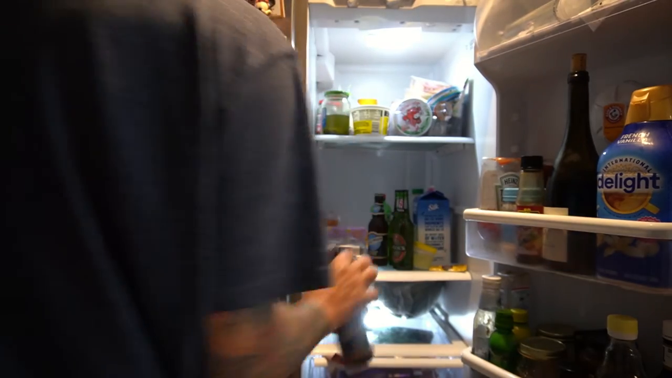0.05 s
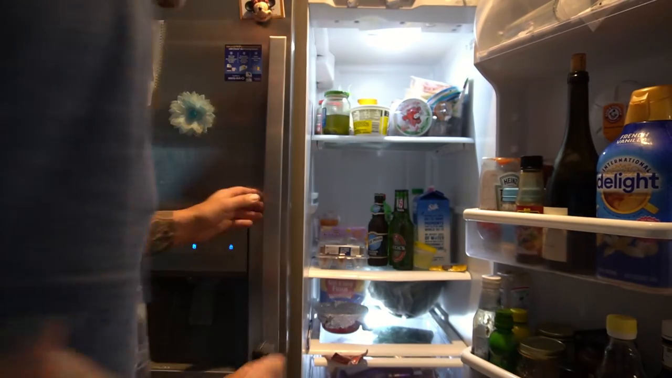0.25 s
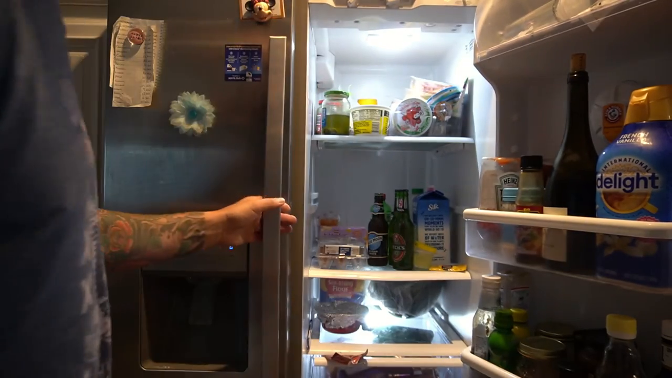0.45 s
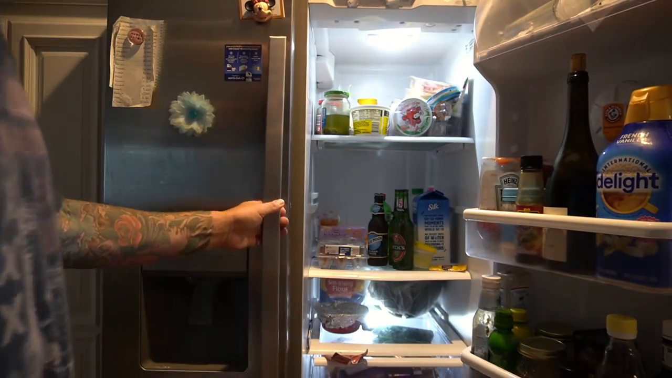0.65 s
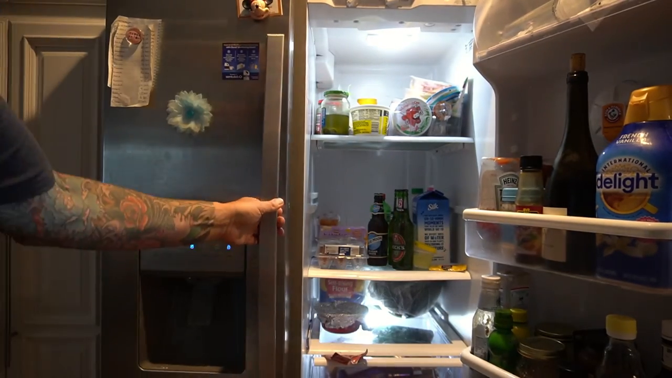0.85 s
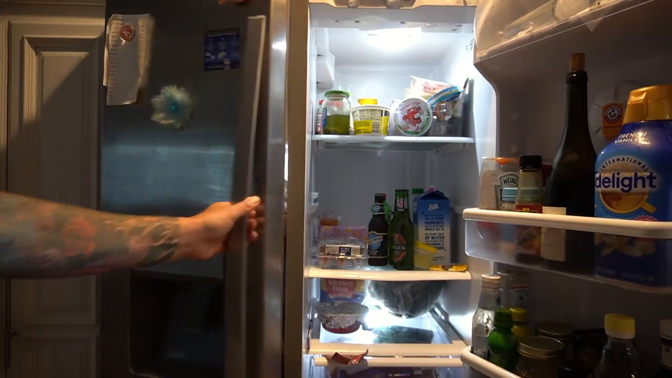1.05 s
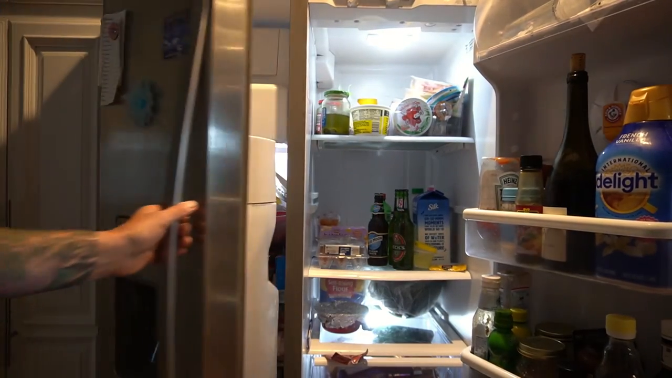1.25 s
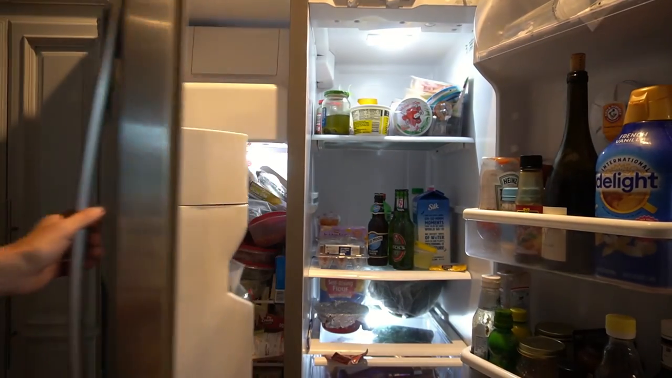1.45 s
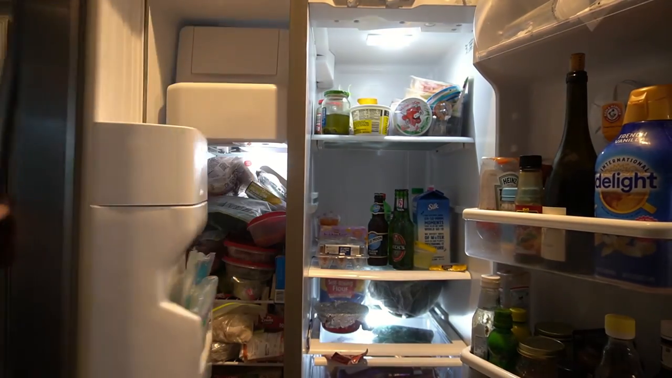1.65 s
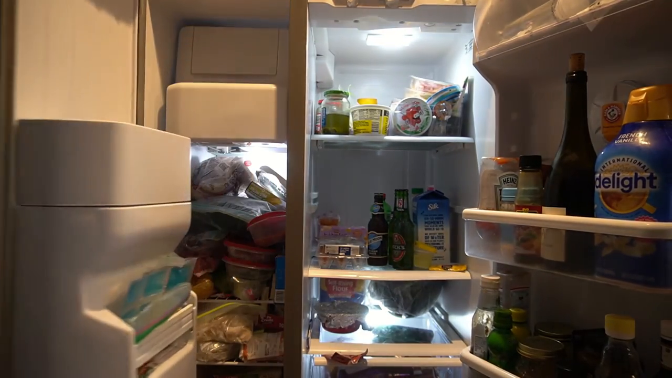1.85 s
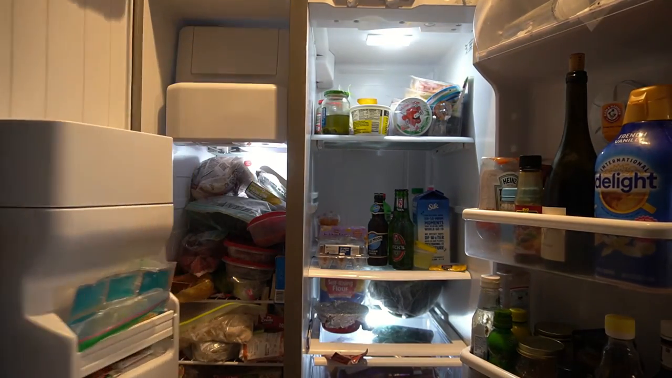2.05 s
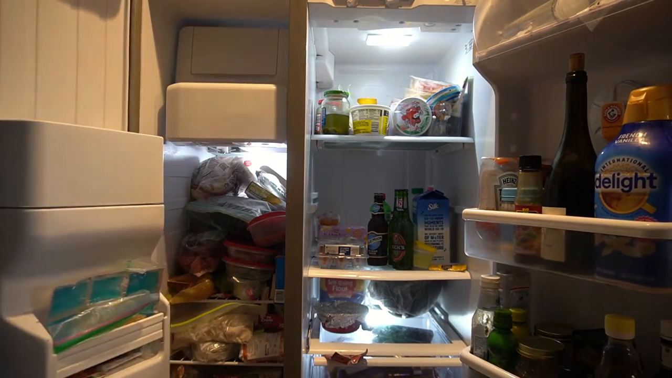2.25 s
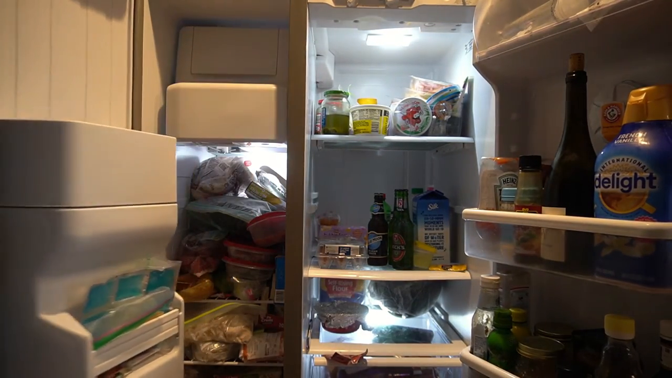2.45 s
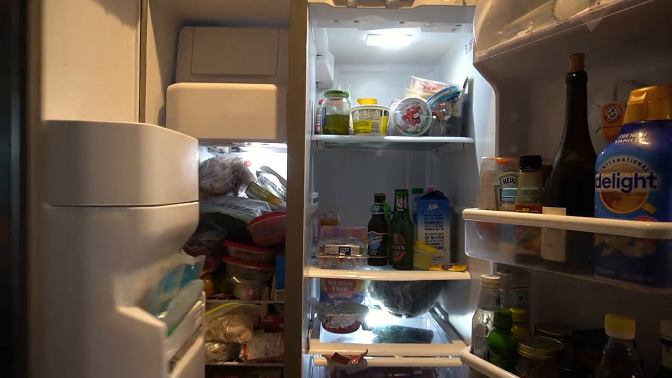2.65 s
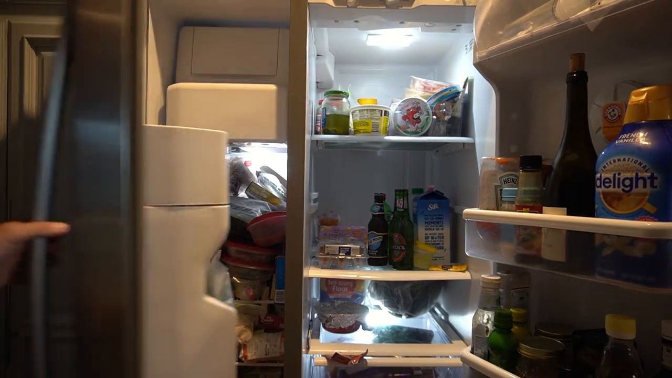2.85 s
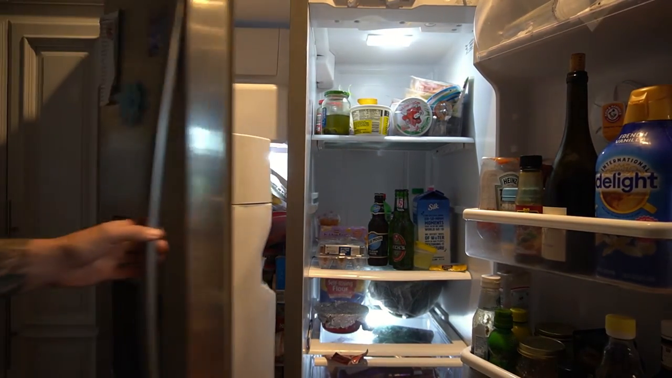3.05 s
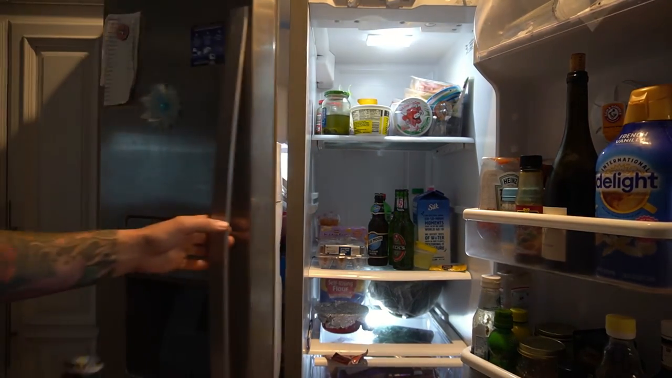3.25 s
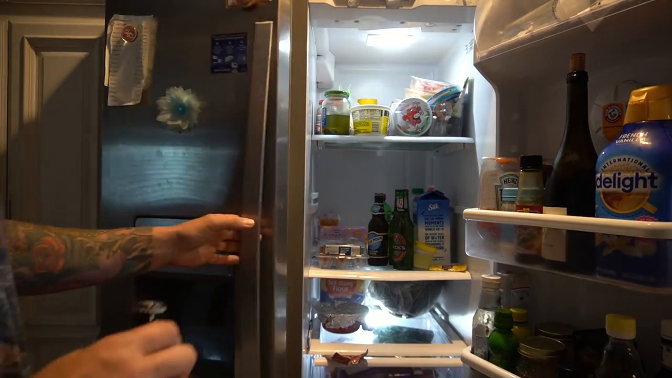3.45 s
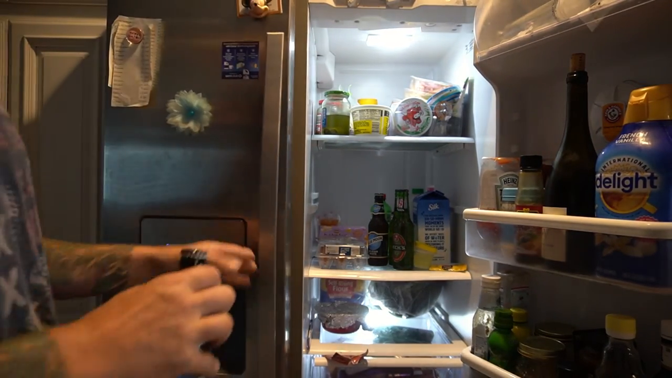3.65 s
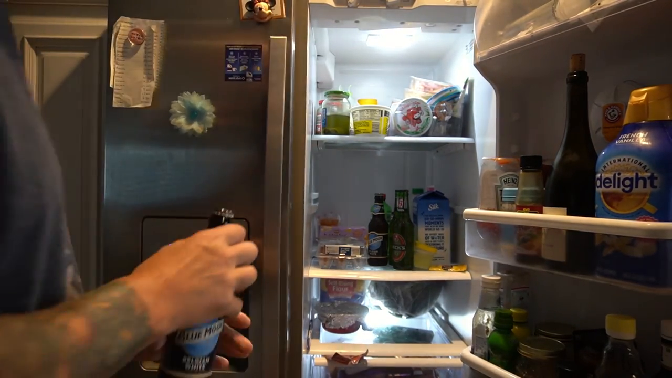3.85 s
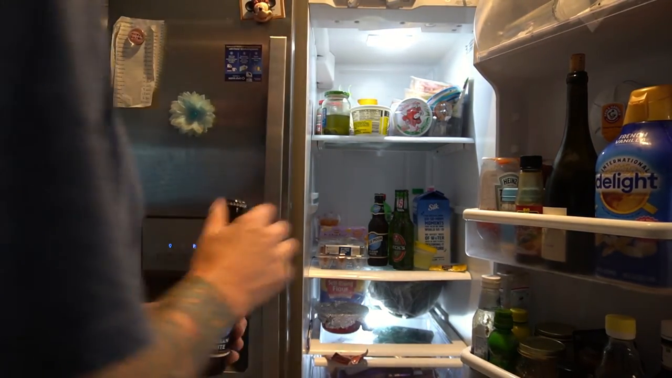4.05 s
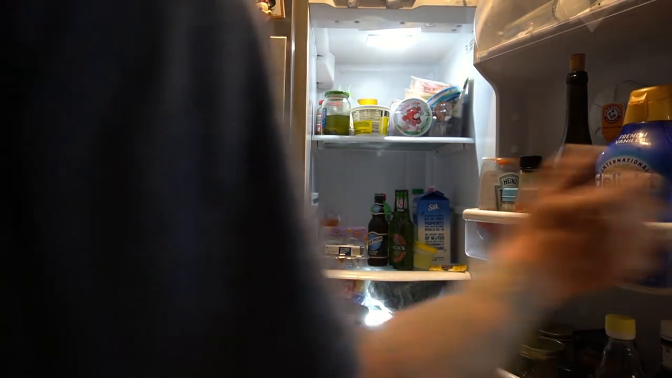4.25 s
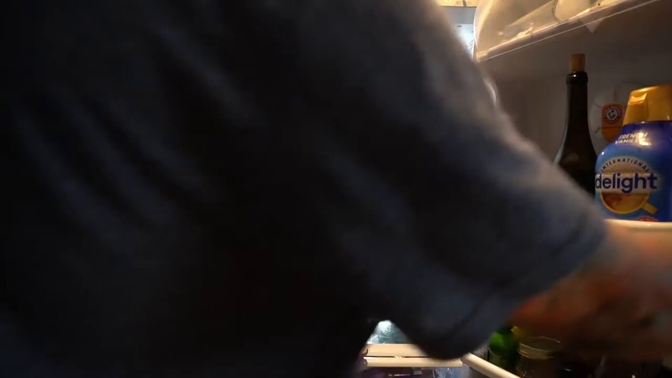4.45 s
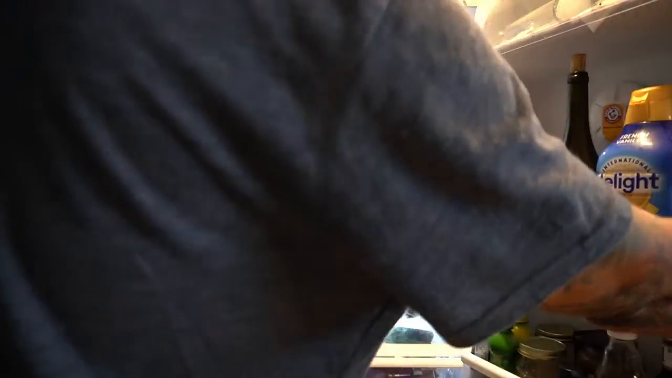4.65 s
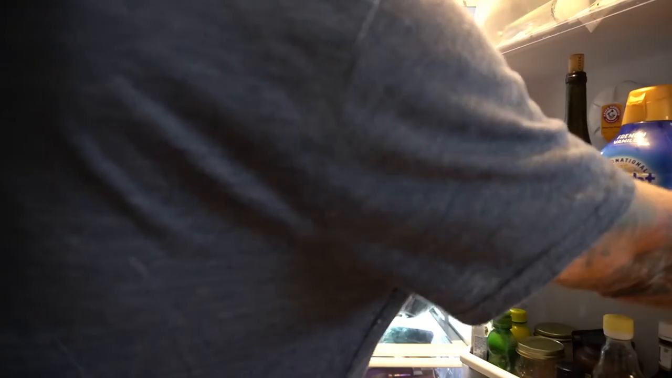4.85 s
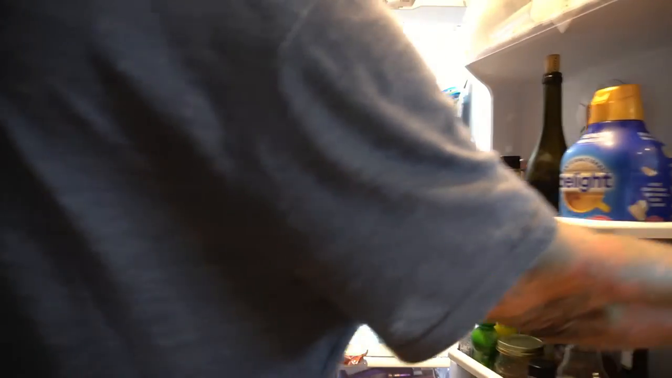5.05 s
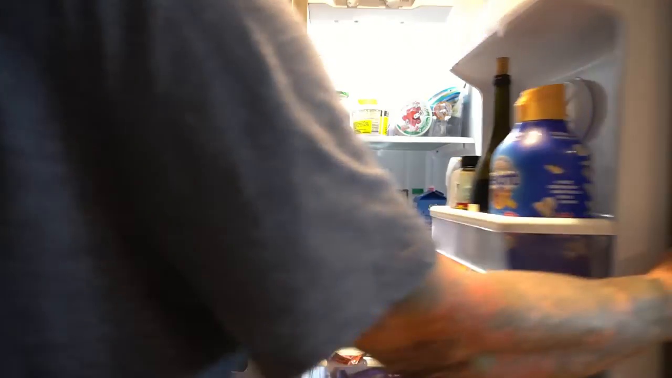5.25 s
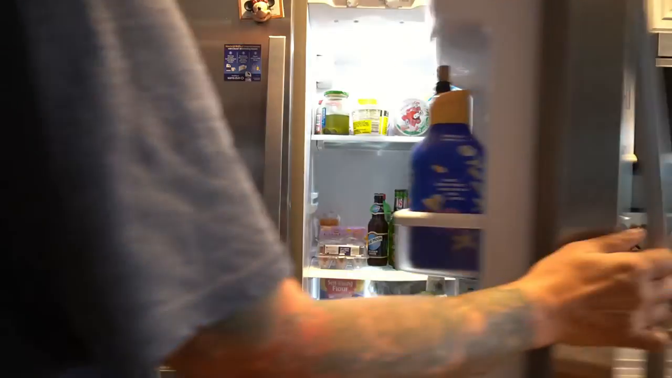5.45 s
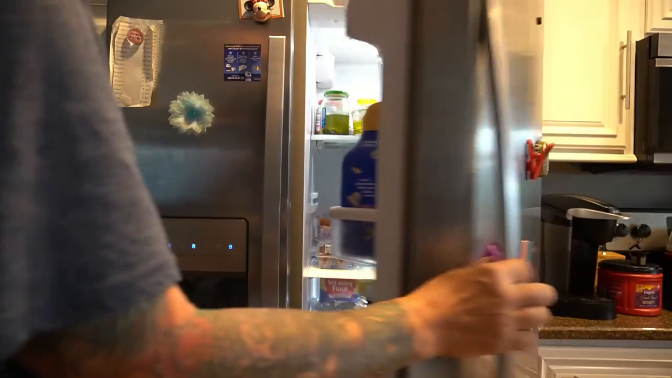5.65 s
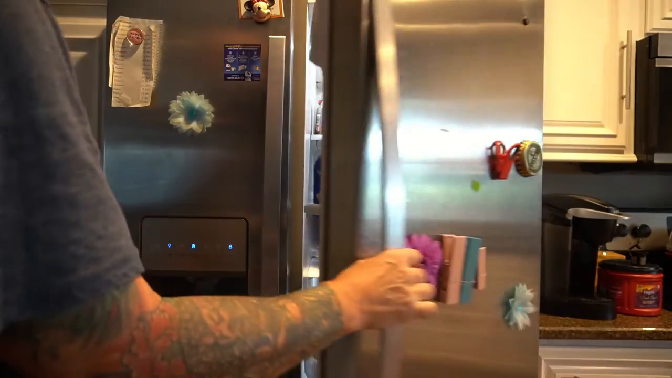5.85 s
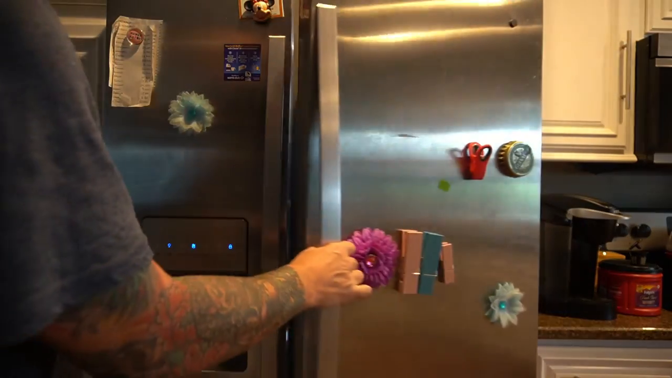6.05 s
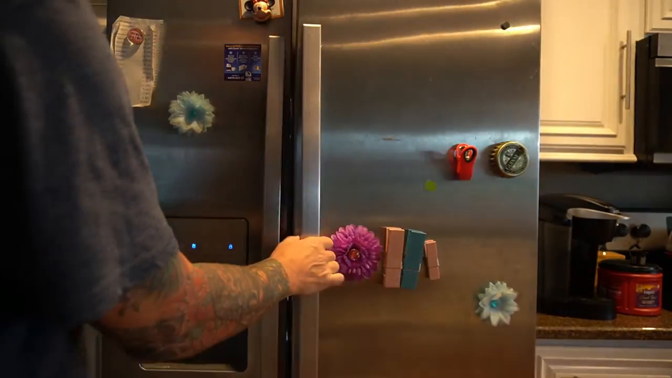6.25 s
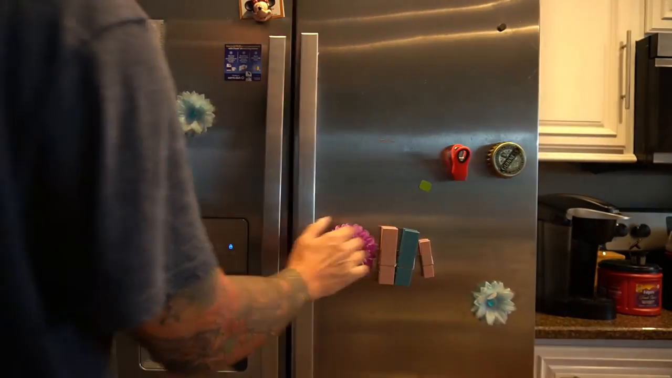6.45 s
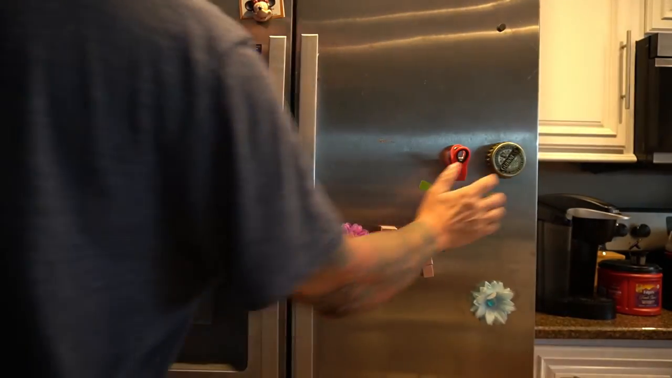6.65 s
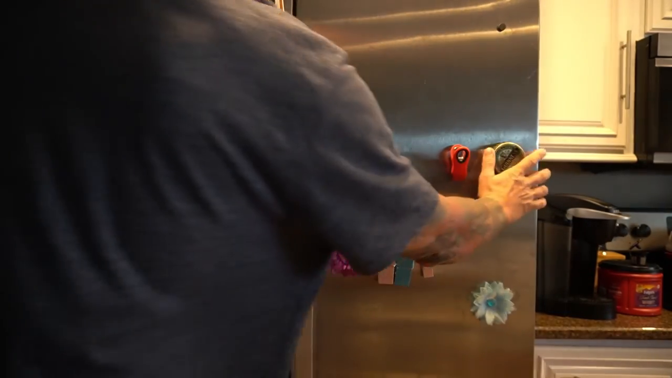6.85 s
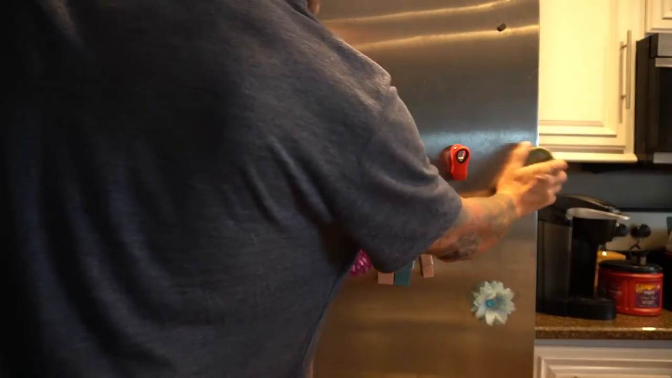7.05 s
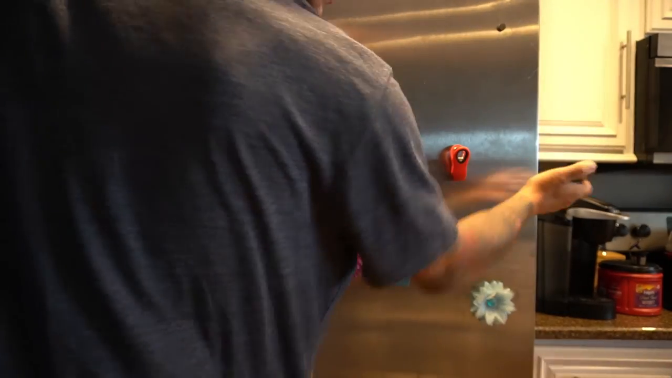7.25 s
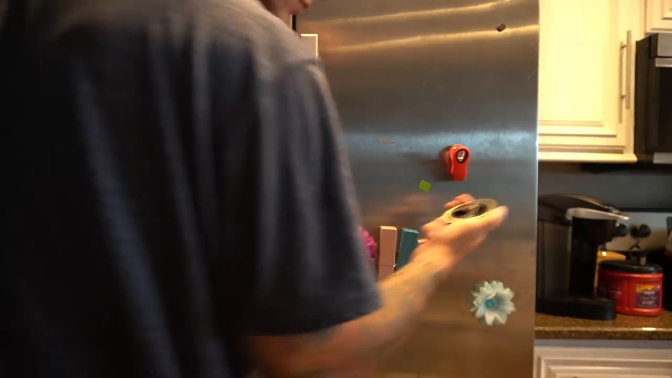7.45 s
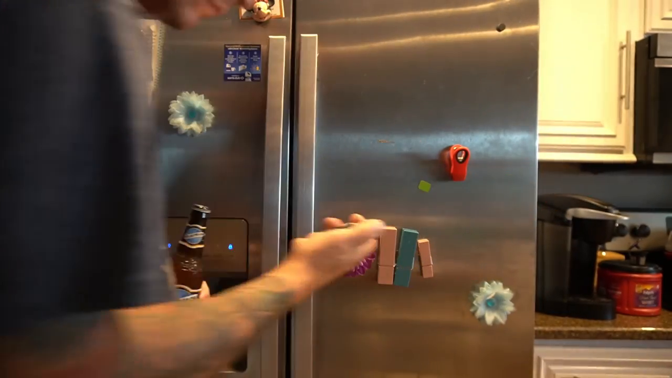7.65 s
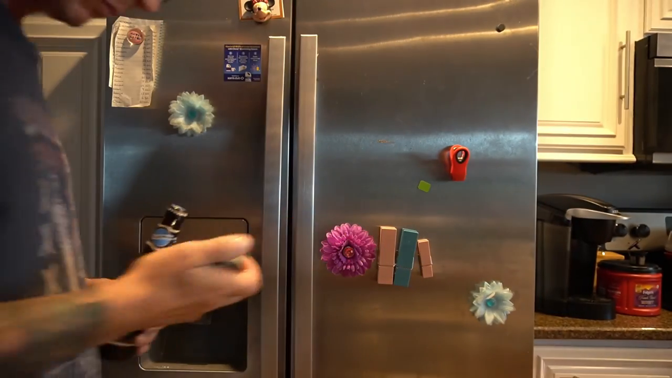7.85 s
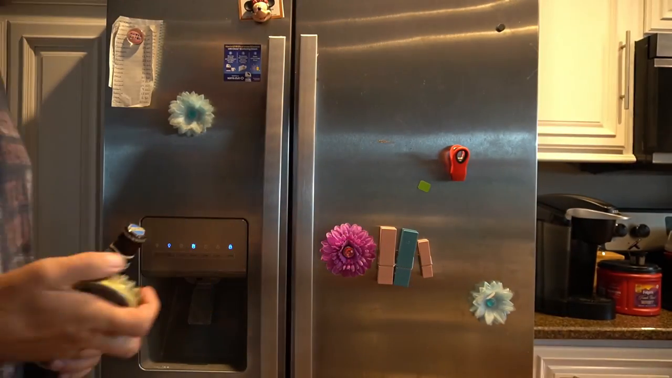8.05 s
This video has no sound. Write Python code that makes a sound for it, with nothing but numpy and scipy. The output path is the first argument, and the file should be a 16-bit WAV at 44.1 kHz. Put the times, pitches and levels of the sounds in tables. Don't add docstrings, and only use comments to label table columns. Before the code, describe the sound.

A refrigerator hums low and steadily in a hard-walled kitchen, heard by close stereo microphones, with a fan tone near 210 Hz and soft rushing air. Sleeves rustle and fingers touch a handle from 0.2 to 0.7 s. At 0.8 s the rubber seal creaks and ticks, then pops and tears free around 0.95-1.05 s; the fan swells clearly as the freezer stands open, with only faint bumps and cloth. Bins rattle at 3.4-3.6 s, a hinge snaps at 3.62, and the door thuds shut at 3.76, rebounding. The fan drops back. Glass is nudged at 4.0, a sleeve scrapes at 4.35, and a bottle clunks into the rack at 4.87, rocking briefly. Jars knock at 6.0, and the big door slams at 6.5. A hand slaps a magnet at 6.9; it snaps off at 7.06 with flapping steel. Soft rustle and hum remain until about 8.1 s.

```python
import sys
import numpy as np
from scipy import signal
from scipy.fft import rfft, irfft
from scipy.io import wavfile
from scipy.ndimage import uniform_filter1d

SR = 44100
rng = np.random.default_rng(int(sys.argv[2]) if len(sys.argv) > 2 else 0)


def pcm_store(signal):
    levels = np.round(np.clip(np.atleast_2d(signal), -1, 1) * 32767)
    wavfile.write(sys.argv[1], SR, levels.astype(np.int16).T)


def invert_db(level):
    return 10 ** (np.asarray(level, dtype=float) / 20)


N = 358091

# frequency in Hz, level in dB rms with the freezer shut, the same with it open.
COMPRESSOR = [(59.8, -55, -54), (120, -54.5, -50), (154.4, -76, -49), (303, -60.5, -53.5),
              (412.3, -57.5, -48.5), (1474, -103, -62), (1685, -79, -71.5), (2997, -72.5, -77),
              (3110, -69.5, -70.5), (11434, -83, -97)]
# time in seconds, level in dB.
FAN = [(0, -42.5), (.9, -42), (1.1, -33), (1.6, -29), (3.1, -30.5), (3.3, -34), (3.7, -33.5), (3.8, -42.5),
       (4.3, -42.5), (4.7, -45), (5.3, -44), (6.4, -50.5), (6.7, -50), (7.4, -52), (8.12, -45)]
BLADE_HZ, SWAY_HZ = 212.3, 204.2
SHUT_DB, OPENING_DB = -48, 22.5
RUSH_DB, RUSH_OPEN_DB = -45.5, 3.5
# frequency in Hz, density in dB per Hz.
RUSH = [(15, -69), (25, -52), (114, -9), (153, -32), (185, -1), (212, -2.5), (263, -16.5), (335, -13.5),
        (416, -15), (476, -17), (1130, -29), (3080, -37.5), (3430, -39), (12500, -49.5), (16000, -51)]

# peak in seconds, rise in seconds, fall in seconds, peak in dB.
SQUEAK = [
    (5.5, .12, .15, -64),
]
# peak in seconds, rise in seconds, fall in seconds, peak in dB, share of sheen from 0 to 1.
RUSTLE = [(.2, .08, 0.192, -58.5, 0.3), (.42, 0.093, 0.185, -66, 1), (.69, 0.16, 0.12, -60.5, 0.24),
          (1.05, 0.028, 0.205, -43.5, 0), (1.28, 0.081, 0.074, -54.5, 0), (1.43, 0.011, 0.038, -61, 1),
          (2.39, 0.056, 0.32, -61.5, 0.2), (2.66, 0.27, 0.191, -62.5, 0.5), (2.98, 0.11, 0.35, -64.5, 0.5),
          (3.355, 0.019, 0.095, -51, 0.36), (4.352, 0.042, 0.046, -53, 1), (4.36, 0.128, 0.24, -55, 0.02),
          (4.5, 0.041, 0.062, -71, 0), (5.47, 0.26, 0.36, -63.5, 0.05), (5.81, .15, 0.19, -62, 0.3),
          (6.7, .02, .03, -58, .5), (6.838, 0.0734, 0.16, -49.5, 0.03), (7.82, 0.14, 0.306, -56.5, 0.13)]
# frequency in Hz, density in dB per Hz.
CLOTH = [(410, -50), (700, 0), (875, 0), (1210, -9), (1280, -4.5), (2130, -3.5), (3600, -5.5), (8420, -6.5),
         (16000, -24.5)]
SWELL_DB = 13
CRACKLE_SHARE, SHEEN_HZ = 0.21, 4700
# peak in seconds, rise in seconds, fall in seconds, peak in dB, pitch in Hz.
SCUFFS = [
    (0.303, 0.031, .05, -51, 2800),
    (4.352, .015, 0.04, -44.5, 3550),
    (4.35, .012, .02, -62, 6500),
    (4.51, .03, .05, -46, 2100),
    (6.835, 0.048, .03, -44, 6300),
]

# frequency in Hz, level in dB.
LIKENESS = [(60, -13), (150, -27.5), (380, -13), (950, -6), (2380, -2.5), (5980, -0.5), (15000, 0.5)]
# frequency in Hz, time to die by 60 dB in seconds.
KITCHEN = [(60, 0.12), (200, 0.386), (500, 0.5414), (1500, 0.56), (4000, 0.4754), (12000, 0.5)]

BANDS_HZ = [90, 700, 2500, 8000]
CLACK_SHARE = 0.41
ONSET_CYCLES = .55

# start in seconds, peak in dB, brightness in dB, contact in milliseconds.
HAND = [
    (.17, -54, 1.5, 40),
    (.28, -46.5, -9.5, 32),
    (.597, -41.5, -28, 86),
    (.68, -38.5, -43, 22),
]
TUG = [
    (.8125, -30, -23, 6.5),
    (.816, -25, -14, 18),
    (.836, -29, 1.5, 8.8),
    (.8525, -18.5, -3.5, 2.96),
    (.862, -25.5, -6, 10),
    (.876, -29, 8, 12),
    (.899, -28, 2, 4),
    (.92, -26, 1, 22),
    (.941, -23, 6, 11),
]
POP = [
    (.9555, -13, 3, 7.3),
    (.968, -19.5, -3, 6.4),
]
PEEL = [
    (.980, -18.5, 2, 3.1),
    (.987, -19.5, -17, 3),
]
HINGE = [
    (2.647, -39.5, -10, 7.6),
    (3.424, -24.5, 14, 5.1),
    (3.434, -21.5, -12.5, 5.7),
    (3.511, -20.5, 17, 26),
    (3.571, -21.5, 6.5, 41),
]
CLOSER = [
    (3.6225, -6.5, -13, 2.7),
    (3.627, -7.5, 0, 4.9),
]
LATCH = [
    (3.6195, -21, -4, 2.5),
    (4.864, -23.5, 1.5, 2.4),
    (6.497, -25, -11, 8),
    (7.051, -9.5, -8, 3),
]
GASKET = [
    (3.751, -15.5, -24, 7.1),
]
NUDGE = [
    (4.021, -26.5, -5, 18),
    (4.755, -25, -13, 0.98),
]
TICKS = [
    (4.7555, -32, -12, 1),
    (4.762, -24.5, -15, 1.5),
    (4.77, -37, -8, 13),
]
JARS = [
    (5.679, -41.5, -9, 14),
    (5.724, -38.5, -3, 14),
    (6.306, -25.5, -12, 4),
    (6.33, -38, -27, 22),
]
GRIP = [
    (6.8985, -10, -5.5, 12),
    (6.905, -15, 12, 6.9),
    (6.925, -19, -18.5, 9.3),
]

# start in seconds, peak in dB, brightness in dB, contact in milliseconds, thump in dB.
SEAL = [
    (1.009, -12.5, 11, 25, -11.5),
    (1.018, -15.5, -15.5, 4.4, 23),
    (1.0275, -5, 20, 7, -7),
    (1.034, -22, 8, 3.1, 11),
    (1.044, -22, -7, 3.5, -22),
    (1.119, -21.5, -3, 6.1, -13),
    (1.279, -31.5, -7, 8.2, -3.5),
    (1.428, -38, -0.5, 4, 4),
]
STOP = [
    (2.189, -43.5, -8, 47, 21),
    (2.428, -50, 5.5, 15, 30),
    (4.488, -35, 4, 20, 15),
]
FREEZER = [
    (3.7595, -3.5, 7.5, 7.3, 10),
    (3.766, -14, -3, 5.9, 16),
    (3.778, -16.5, -23, 8, 11),
    (3.784, -17.5, -13.5, 3, 1),
    (3.8, -14, -4.5, 13, -3),
    (3.826, -21.5, -1, 10, 5),
]
RACK = [
    (4.867, -11.5, 8, 8.2, 7),
    (4.873, -13, 8.5, 3.35, 3),
    (4.884, -19.5, 10, 6, 6),
    (4.902, -21.5, 3, 18, -3),
    (4.941, -18, -13, 4.3, 9),
    (4.958, -24.5, -5, 10, 2),
    (4.984, -27, -13, 5.1, 16),
]
SHELF = [
    (5.9985, -13.5, -0.5, 10, 15),
    (6.004, -13, 8, 20, 11),
    (6.013, -24, 0, 10, -2.5),
    (6.187, -32, -9, 25, -18.5),
]
SLAM = [
    (6.5065, -6, 5.5, 0.87, 1.5),
    (6.516, -23, -5.5, 6.7, -11),
    (6.539, -23.5, -11, 11.7, 8),
    (6.575, -20.5, -20, 16, 6),
]
MAGNET = [
    (7.0555, -4, 0, 3, 5),
    (7.061, -7, 5, 14, 7.5),
    (7.074, -10, -14, 17, 2),
    (7.105, -11, -6, 20, -23),
    (7.155, -24, -6, 7, -22),
    (7.192, -21.5, -14.5, 11, -12),
    (7.245, -39, -17, 11.4, -16.5),
]

# frequency in Hz, density in dB per Hz.
TUG_BODY = [(18, -39), (30, -11.5), (87, 9.5), (200, -6), (337, -0.5), (374, -2), (437, -11), (698, -10.5),
            (4780, -20.5), (9890, -21.5), (15000, -42.5)]
SEAL_BODY = [(150, -28), (250, -13.5), (393, -4), (586, -2), (686, -5.5), (761, -6.5), (1100, -6.5),
             (2400, -7.5), (2760, -8), (5350, -12), (6140, -12.5), (12500, -25), (16000, -34)]
HINGE_BODY = [(290, -39), (500, 4), (1050, 2), (1230, -2.5), (1930, 3), (3510, 3.5), (4290, 0.5), (6390, 1),
              (15000, -20.5)]
CLOSER_BODY = [(150, -30.5), (250, -15), (323, -20), (433, 3.5), (631, -19.5), (736, -6), (1510, -7.5),
               (1650, -6.5), (2530, -9.5), (3810, -14), (4300, -13.5), (15000, -31)]
FREEZER_BODY = [(15, -36), (25, -1), (55, -0.5), (120, -8), (153, -0.5), (301, -7), (394, 0), (451, 0),
                (775, -3), (1190, -4.5), (8360, -19), (14800, -44), (16000, -44)]
RACK_BODY = [(24, -52), (40, -9), (98, 0.5), (239, 0), (291, -4), (527, 1.5), (784, -7.5), (1080, -9),
             (1230, -13), (1460, -20.5), (1690, -11), (3070, -14.5), (15000, -45)]
SHELF_BODY = [(35, -31), (60, -8.5), (166, -2), (195, 2), (324, -3), (591, 5.5), (895, 1), (1030, -1),
              (3500, -4.5), (4510, -2.5), (7860, -15.5), (10100, -31), (15000, -41)]
SLAM_BODY = [(15, -31), (25, -2), (86, 2), (125, -32), (158, -2.5), (271, -6.5), (404, -2.5), (811, -2),
             (1210, -9), (1670, -9), (4150, -29), (6720, -26), (15000, -49)]
GRIP_BODY = [(35, -46), (60, -17), (108, -43), (168, -4.5), (262, -28), (308, -7.5), (389, -50.5),
             (480, -24.5), (579, -20), (666, -26), (1510, -26), (8710, -39), (16000, -51)]
MAGNET_BODY = [(35, -52), (60, -27.5), (91, -22), (146, -17), (222, -4), (323, -15), (492, -1.5), (767, -6),
               (842, -4), (1550, -10), (2190, -18), (7750, -28), (16000, -48)]

# frequency in Hz, width in Hz, lift in dB.
TUG_MODES = [(900, 880, -1), (1850, 500, 1.5)]
POP_MODES = [(528, 220, 13.7), (1820, 250, 6.1), (5900, 250, 11)]
PEEL_MODES = [(620, 165, 4.2), (2744, 350, 12)]
SEAL_MODES = [(990, 350, 1), (3860, 234, 0), (6350, 430, 3), (9100, 880, 4)]
CLOSER_MODES = [(420, 90, -3), (1113, 170, 3.5), (1652, 260, 6.6), (3420, 400, 3), (3800, 300, 5)]
GASKET_MODES = [(1515, 250, 10), (2330, 270, 21)]
TICK_MODES = [(2570, 450, 16), (3140, 250, -5.5)]
RACK_MODES = [(448, 108, 1.47), (1110, 130, 11), (1460, 85, 20.1), (2874, 590, 2.6), (6500, 1160, 3.2)]
JAR_MODES = [(720, 52, 8), (1020, 90, 17.5), (1330, 120, 20.5), (1970, 112, 0.5), (2410, 80, 1)]
SHELF_MODES = [(570, 420, 2), (1700, 52, 1.6), (4660, 335, 3.6), (6100, 160, 2.6), (7760, 400, 13)]
SKIN_MODES = [(650, 102, 1.3), (890, 220, 1.2), (1132, 60, 1.2), (1338, 35, 2.5), (1606, 36, 3),
              (1790, 12, 1.3), (2030, 18, 2.6)]
GRIP_MODES = [(171.4, 20.5, -1), (300, 17, -6), (480, 48, 4), (801, 32, 5), (1544, 78, 5)]

# start in seconds, peak in dB, pitch in Hz, cycles to die by 9 dB (the sign has no meaning).
SNAPS = [(0.8533, -20, 900, 1), (.899, -25, 1400, 1), (.956, -24.5, 5900, 22), (.957, -24.5, 1790, 7),
         (.958, -26.5, 554.6, -3.5), (0.981, -22.5, 2733, 9), (.989, -24, 657, 2.5),
         (1.009, -25.5, 3680, 12), (1.0173, -15.5, 397, 0.8), (1.028, -15.5, 6200, 11),
         (1.03, -19, 396, 0.5), (1.0347, -17, 6300, 4), (3.6225, -15.5, 3470, 10), (3.627, -13, 1646, 6.5),
         (3.629, -30, 418, 9), (3.7601, -4.5, 6500, 1.2), (3.765, -15.5, 508, 2.5),
         (3.7688, -13.5, 110, -0.5), (3.7831, -11.5, 130, -3), (4.022, -30.5, 550, 4),
         (4.756, -24.5, 609, 2), (4.868, -21.5, 3010, 3), (4.869, -15, 443, 1.5), (4.882, -27, 1460, 8),
         (4.883, -23, 197, 1), (4.905, -28.5, 1090, 22), (4.94, -24.5, 505, 2.5), (4.985, -30.5, 553, 6),
         (5.996, -22, 570, 5.5), (5.997, -27, 1700, 4), (5.998, -18, 5000, 0.4), (6.008, -33, 4460, 40),
         (6.505, -10, 700, 2.5), (6.506, -22.5, 48.4, 2.7), (6.5075, -16, 3000, .6),
         (6.8987, -10, 6130, 0.2), (7.0556, -11, 3000, 0.3), (7.057, -12.5, 837, 6), (7.058, -25, 2030, 21)]


def rms_one(x):
    return x / np.sqrt(np.mean(x ** 2) + 1e-20)


def in_time(rows):
    seconds, *columns = np.transpose(rows)
    return [np.interp(np.arange(N) / SR, seconds, column) for column in columns]


def at_hz(points, hz):
    table_hz, values = np.array(points).T[:2]
    return np.interp(np.log(hz), np.log(table_hz), values)


def bandpass(low_hz, high_hz):
    return signal.butter(2, [low_hz, high_hz], "band", fs=SR, output="sos")


def drift(rate):
    r = np.exp(-80 * np.pi * rate / SR)
    slow = signal.lfilter([1], [1, -2 * r, r * r], rng.standard_normal(N // 40 + 2002))[2000:]
    return np.interp(np.arange(N) / 40, np.arange(len(slow)), rms_one(slow))


def swell(s, rise, fall, db):
    t = np.arange(N) / SR - s
    return invert_db(db - SWELL_DB * np.minimum(np.maximum(-t / rise, t / fall), 9))


def resonate(x, hz, width):
    r = np.exp(-np.pi * width / SR)
    return signal.lfilter([(1 - r * r) / 2, 0, (r * r - 1) / 2], [1, -2 * r * np.cos(2 * np.pi * hz / SR), r * r], x)


def spread(white, spectrum):
    hz = np.maximum(np.arange(N // 2 + 1) * SR / N, 1)
    mid, side = rfft(white) * invert_db(at_hz(spectrum, hz))
    side = side * invert_db(at_hz(LIKENESS, hz))
    return rms_one(irfft(mid + side * [[1], [-1]], N))


def opening():
    return np.clip((in_time(FAN)[0] - SHUT_DB) / OPENING_DB, 0, 1)


def kitchen(x):
    t = np.arange(SR) / SR
    edges = 113 * 2 ** np.arange(0, 7.6, .5)
    white = rng.standard_normal((2, 2, SR))
    tail = 0
    for k, (low, high) in enumerate(zip(edges, edges[1:])):
        mid, side = signal.sosfilt(bandpass(low, high), white[k % 2])
        hz = np.sqrt(low * high)
        wide = invert_db(at_hz(LIKENESS, hz) - 2.0)
        decay = invert_db(-60 * t / at_hz(KITCHEN, hz))
        tail = tail + decay * (mid + wide * side * [[1], [-1]])
    tail = tail * (1 - np.exp(-t / 0.00025)) / np.sqrt(np.sum(tail ** 2) / 2)
    return signal.fftconvolve(x[None], tail, axes=1)[:, :N]


def compressor():
    t, ajar = np.arange(N) / SR, opening()
    lines = 0
    for hz, shut_db, open_db in COMPRESSOR:
        level = invert_db(shut_db + ajar * (open_db - shut_db) + 3.5 + 2.03 * drift(5.4))
        phase = 6 * rng.random() + hz / 1500 * drift(3.4)
        lines = lines + level * np.sin(2 * np.pi * hz * t + phase)
    rumble = rms_one(signal.sosfilt(bandpass(35, 170), rng.standard_normal(N)))
    return lines + invert_db(-56 + 3.1 * ajar + 0.52 * drift(8.1)) * rumble


def fan():
    tone_db, = in_time(FAN)
    t = np.arange(N) / SR
    blade = invert_db(.6 * drift(2)) * np.sin(2 * np.pi * BLADE_HZ * t + .15 * drift(2))
    sway = invert_db(-13) * np.sin(2 * np.pi * SWAY_HZ * t + .3 * drift(2))
    duct = invert_db(-14.5) * rms_one(resonate(resonate(rng.standard_normal(N), 231.7, 50), 231.0, 42))
    rush = spread(rng.standard_normal((2, N)), RUSH) * invert_db(0.09 * drift(41))
    return invert_db(tone_db) * (blade + sway + duct) + invert_db(RUSH_DB + RUSH_OPEN_DB * opening()) * rush


def hinge_whistle():
    narrow = resonate(resonate(rng.standard_normal(N), 4210, 220), 4210, 220)
    return swell(*SQUEAK[0]) * rms_one(narrow)


def rustle():
    smooth = spread(rng.standard_normal((2, N)), CLOTH)
    sizes = invert_db(3.8 * np.minimum(rng.exponential(1, (2, N)), 4)) * rng.choice([-1, 1], (2, N))
    happens = rng.random(N) < 1500 * invert_db(4 * drift(30)) / SR
    grains = spread(sizes * happens, CLOTH)
    cloth = np.sqrt(1 - CRACKLE_SHARE) * smooth + np.sqrt(CRACKLE_SHARE) * grains
    dull = rms_one(signal.lfilter(*signal.butter(1, SHEEN_HZ, "low", fs=SR), cloth))
    bright = rms_one(signal.lfilter(*signal.butter(1, SHEEN_HZ, "high", fs=SR), cloth))
    share = np.array(RUSTLE)[:, 4]
    levels = np.sqrt([1 - share, share]) @ [swell(*move[:4]) for move in RUSTLE]
    eased = uniform_filter1d(levels, size=800) * invert_db(5.5 + 1.28 * drift(45))
    return eased[0] * dull + eased[1] * bright


def scuffs():
    grit = rng.standard_normal((2, N)) * invert_db(3 * drift(60))
    return sum(swell(*row[:4]) * rms_one(resonate(grit, row[4], row[4] / 4.8)) for row in SCUFFS)


def dying_band(sos, x, size):
    return rms_one(np.pad(signal.sosfilt(sos, x[:size]), (0, max(len(x) - size, 0))))


def blows(rows, body, modes=(), crack_db=0, room_db=0, thump_cycles=3.5, light_db=-3, rebound_ms=.01):
    out, t = np.zeros((2, N + SR)), np.arange(SR // 4) / SR
    centres = np.r_[38, 76, 125 * 2 ** np.arange(0, 7.2, 1 / 3)]
    widths = np.where(centres < 100, 1, 1 / 3)
    bank = [bandpass(hz * 2 ** (-w / 2), hz * 2 ** (w / 2)) for hz, w in zip(centres, widths)]
    skips = (ONSET_CYCLES * SR / (centres * widths)).astype(int)
    span = len(t) - SR // 50
    touch = 1 - np.exp(-t[:span] / .0002)
    pulses = np.array([rms_one(signal.sosfilt(sos, 1. * (t == 0)))[:span] for sos in bank])
    above_hum = signal.butter(2, 400, "high", fs=SR, output="sos")
    crack = invert_db(crack_db) * np.exp(-t / 0.00028)
    signs = (-1) ** np.arange(len(centres))
    for s, db, bright_db, ms, *thump_db in rows:
        rattle = rng.standard_normal(len(t)) * invert_db(6.4 * rng.standard_normal(len(t)))
        if s > rows[0][0]:
            rattle = rattle * (1 - np.exp(-(t + 1 / SR) * 1000 / rebound_ms))
        character_db = [*(thump_db or [light_db]), 0, CLACK_SHARE * bright_db, bright_db]
        shift_db = np.interp(np.log(centres), np.log(BANDS_HZ), character_db)
        gains = invert_db(at_hz(body, centres) + shift_db) * np.sqrt(centres * widths) * signs
        lengths = np.clip(ms, .5, 80) / 1000 + thump_cycles / centres
        sizes = ((8 * lengths + 9 / (centres * widths)) * SR).astype(int)
        bands = []
        for sos, tau, skip, size in zip(bank, lengths, skips, sizes):
            band = dying_band(sos, rattle * (np.exp(-t / tau) + crack), size)
            bands.append(band[skip:skip + span])
        hit = touch * (gains @ bands)
        pair = np.array([hit, invert_db(room_db) * gains @ pulses])
        ringing = sum((invert_db(lift_db) * resonate(pair, hz, width) for hz, width, lift_db in modes), 0 * pair)
        pair = pair + [[1], [.4]] * ringing
        peak = np.abs(signal.sosfilt(above_hum, pair[0])).max()
        out[:, round(s * SR):][:, :span] += invert_db(db - 4.0) * pair / peak
    return out[:, :N]


def snaps():
    out, t = np.zeros(N), np.arange(SR // 12) / SR
    for s, db, hz, cycles in SNAPS:
        decays = t * hz / abs(cycles)
        swing = np.sin(2 * np.pi * hz * t) * np.exp(-decays) * (1 - np.exp(-decays / 0.12))
        out[round(s * SR):][:len(t)] -= invert_db(db) * swing / swing.max()
    return np.array([out, invert_db(-17) * out])


def small_touches():
    return (blows(LATCH, CLOSER_BODY, crack_db=-20, room_db=-3.0)
            + blows(GASKET, CLOSER_BODY, GASKET_MODES, crack_db=-20, room_db=-4, rebound_ms=2)
            + blows(NUDGE, RACK_BODY, crack_db=4, room_db=-5.0, light_db=-6.5)
            + blows(TICKS, HINGE_BODY, TICK_MODES, crack_db=4, room_db=-7.5)
            + blows(JARS, HINGE_BODY, JAR_MODES, crack_db=-3, room_db=0.5, light_db=-11))


def bottle_and_jars():
    return (blows(RACK, RACK_BODY, RACK_MODES, crack_db=8, room_db=-3.5, thump_cycles=1.6, rebound_ms=0.95)
            + blows(SHELF, SHELF_BODY, SHELF_MODES, crack_db=-11.5, room_db=-3.3))


def magnet():
    return (blows(GRIP, GRIP_BODY, GRIP_MODES, crack_db=14, room_db=-5.0, light_db=-5.5, rebound_ms=1.4)
            + blows(MAGNET, MAGNET_BODY, SKIN_MODES, crack_db=7, room_db=0.0, rebound_ms=1.1))


def big_door():
    return (blows(STOP, SLAM_BODY, crack_db=-13, room_db=-4.0)
            + blows(SLAM, SLAM_BODY, SKIN_MODES, crack_db=10, room_db=1.1, thump_cycles=2.6, rebound_ms=3.6))


def freezer_door():
    pulled = (blows(HAND, HINGE_BODY, crack_db=-20, room_db=1.5)
              + blows(TUG, TUG_BODY, TUG_MODES, crack_db=-8, room_db=-1.0, light_db=1.5)
              + blows(POP, SEAL_BODY, POP_MODES, crack_db=-11, room_db=-3.0, thump_cycles=2.14)
              + blows(PEEL, SEAL_BODY, PEEL_MODES, crack_db=4.5, room_db=3.0)
              + blows(SEAL, SEAL_BODY, SEAL_MODES, crack_db=7.5, room_db=-6.0, thump_cycles=1.95))
    swung = blows(HINGE, HINGE_BODY, crack_db=-5.5, room_db=-1.5, light_db=-9)
    shut = (blows(CLOSER, CLOSER_BODY, CLOSER_MODES, crack_db=-4, room_db=-5.0, thump_cycles=1.5)
            + blows(FREEZER, FREEZER_BODY, crack_db=21.0, room_db=-2.5, thump_cycles=2.2, rebound_ms=1.4))
    return pulled + swung + shut


def scene():
    knocks, to_room = snaps() + small_touches() + bottle_and_jars() + magnet() + big_door() + freezer_door()
    late = np.roll(knocks, shift=1)
    direct = np.array([late, knocks])
    steady = compressor() + fan()
    friction = hinge_whistle() + rustle() + scuffs()
    return direct + kitchen(to_room) + steady + friction


def band_limit(x):
    return signal.sosfilt(signal.butter(12, 16830, fs=SR, output="sos"), x)


def record(dry):
    rounded = 1.2 * np.tanh(dry / 1.2)
    finished = signal.sosfilt(signal.cheby2(8, 40, 17000, fs=SR, output="sos"), rounded)
    return band_limit(finished)


dry = scene()
out = record(dry)
pcm_store(out)
```